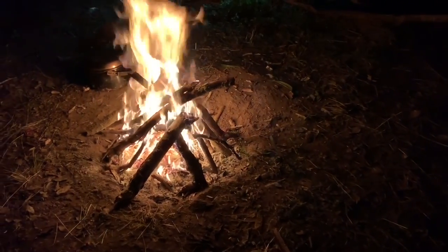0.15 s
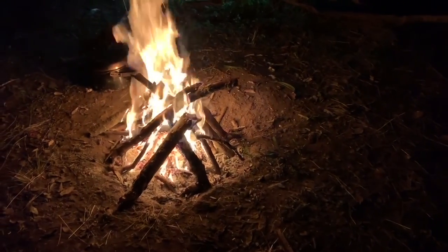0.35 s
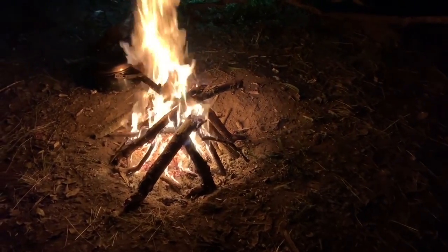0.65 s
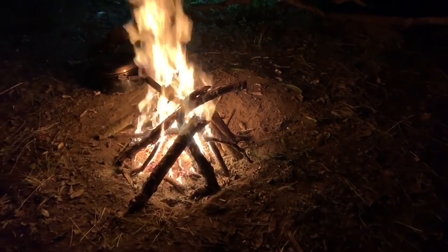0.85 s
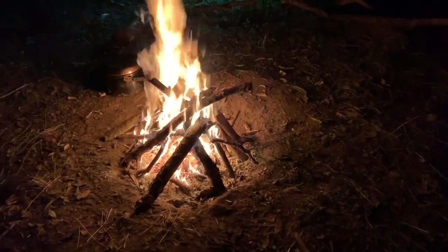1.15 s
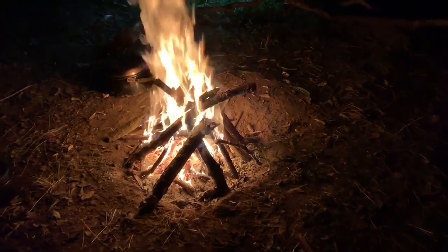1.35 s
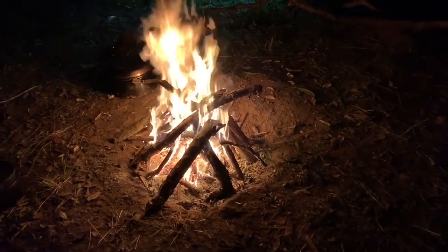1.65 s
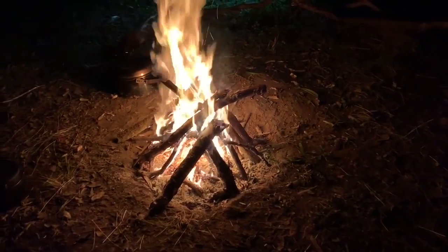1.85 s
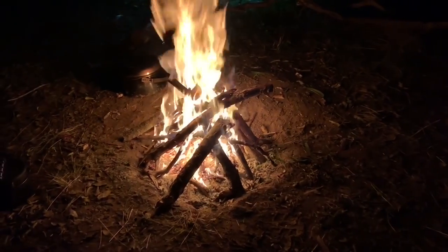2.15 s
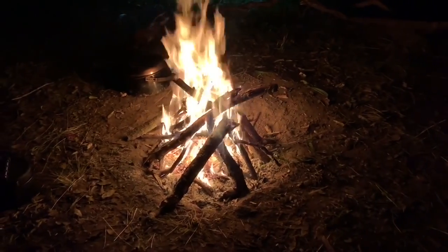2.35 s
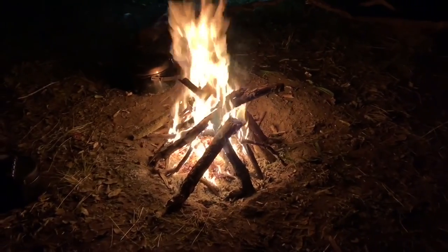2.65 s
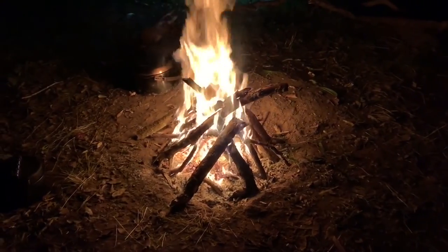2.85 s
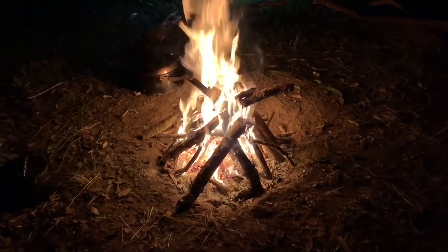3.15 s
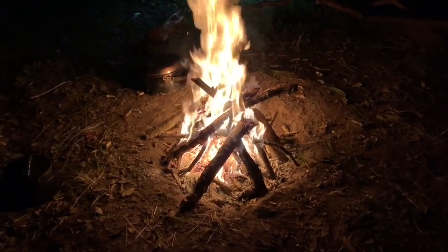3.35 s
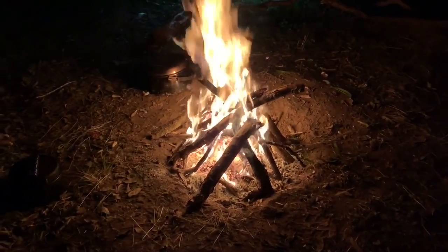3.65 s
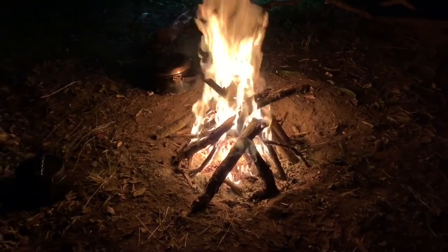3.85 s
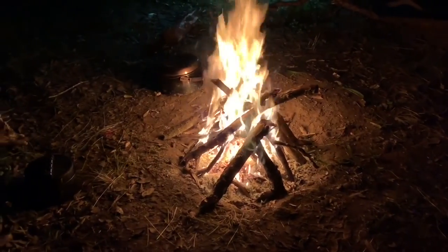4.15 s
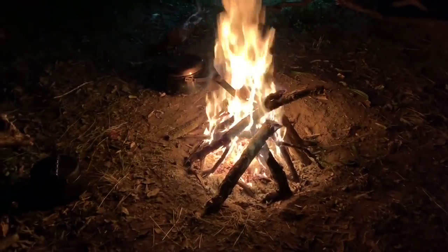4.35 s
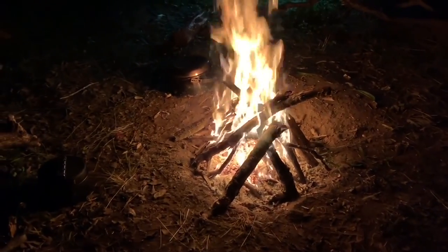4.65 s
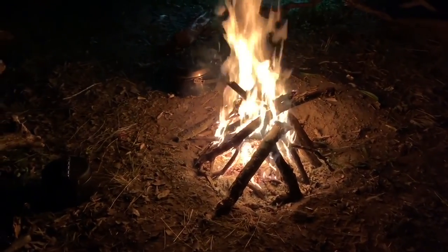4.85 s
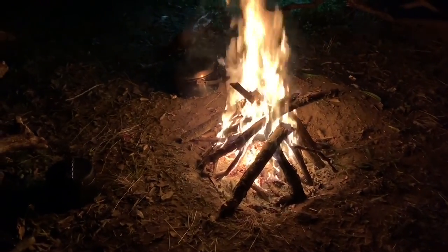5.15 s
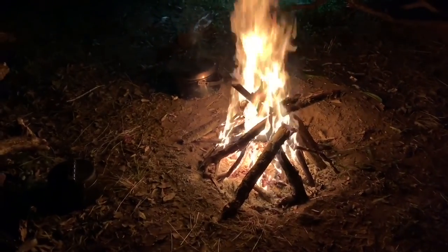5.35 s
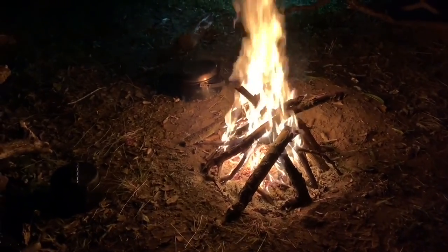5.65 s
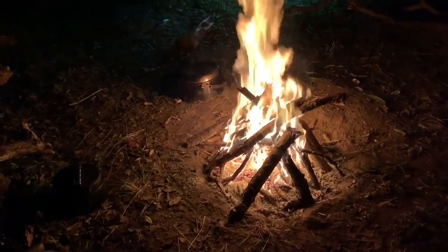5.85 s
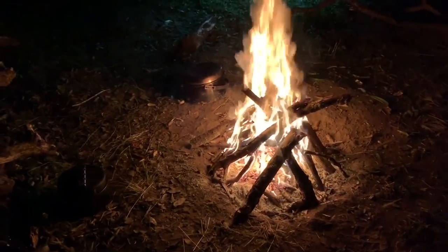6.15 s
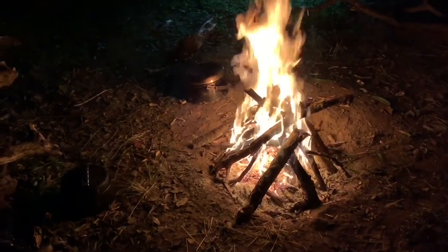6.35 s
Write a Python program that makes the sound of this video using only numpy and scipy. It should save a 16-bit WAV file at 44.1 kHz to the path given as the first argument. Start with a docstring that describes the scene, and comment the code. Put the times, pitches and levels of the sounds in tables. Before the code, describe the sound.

Crickets trill all around a low, rumbling campfire as sap snaps in bursts and burning sticks knock and settle.

```python
"""Tree crickets trill all around a low, rumbling wood fire: outdoors at night, a two-port phone
microphone a couple of metres from the flames. Pockets of sap pop and sputter steam, the flames flap,
sticks knock as they settle. Off to the left two lone crickets chirp in pairs with strokes of their
wings. Ground and bushes scatter pops, knocks and cricket song into a short tail."""
import sys
import numpy as np
from scipy import signal
from scipy.fft import rfft, irfft
from scipy.io import wavfile
from scipy.ndimage import uniform_filter1d

SR = 44100
rng = np.random.default_rng(int(sys.argv[2]) if len(sys.argv) > 2 else 0)


def inscribe(sig):
    """Save sig as 16-bit PCM at rate SR to the path in sys.argv[1].

    A 1-D sig is mono; a 2-D sig holds one channel per row.
    Samples are clipped to [-1, 1] before scaling.
    """
    pcm = np.round(np.clip(np.atleast_2d(sig).T, -1, 1) * 32767)
    wavfile.write(sys.argv[1], SR, pcm.astype(np.int16))


N = 286559
T = np.arange(N) / SR


def undb(db):
    return 10 ** (np.asarray(db) / 20)


def unit_rms(x):
    return x / np.sqrt(np.mean(x ** 2))


def unit_peak(x):
    return x / np.max(np.abs(x))


def gain_curve(rows):
    """Gain through (time [s], level [dB]) rows, silent outside them."""
    times, db = np.transpose(rows)
    return undb(np.interp(T, times, db, left=-150, right=-150))


def band(x, lo_hz, hi_hz):
    return signal.sosfilt(signal.butter(2, [lo_hz, hi_hz], "bandpass", fs=SR, output="sos"), x)


def coloured_noise(spectrum, side_db):
    """Mid-side stereo noise of rms 1, shaped by (frequency [Hz], relative density [dB]) rows."""
    hz, db = np.transpose(spectrum)
    log_hz = np.log(np.fft.rfftfreq(N, 1 / SR) + 1)
    gain = undb(np.interp(log_hz, np.log(hz), db, left=-99, right=-99))
    mid, side = irfft(rfft(rng.standard_normal((2, N))) * gain, N)
    return unit_rms(np.array([mid + undb(side_db) * side, mid - undb(side_db) * side]))


def wander(rate_hz):
    """Smooth random drift of rms 1, with about rate_hz new values a second."""
    hop = 32
    hold = max(int(SR / hop / rate_hz), 1)
    steps = np.repeat(rng.standard_normal(N // hop // hold + 2), hold)
    smooth = uniform_filter1d(uniform_filter1d(steps, hold), hold)
    return np.interp(np.arange(N) / hop, np.arange(len(smooth)), unit_rms(smooth))


def add(out, at_s, sound, pan_db):
    """Mix a short sound in; pan_db is left minus right."""
    start = int(at_s * SR)
    n = min(len(sound), N - start)
    out[:, start:start + n] += sound[:n] * undb([[pan_db / 2], [-pan_db / 2]])


def tree_crickets(count=20):
    """Chorus all around: each rubs its wings about 45 times a second, every stroke a falling tone."""
    # swell of the chorus: (time [s], level [dB])
    swell = [(0, -48.5), (3, -48.5), (6.5, -47.5)]
    out = np.zeros((2, N))
    ranks = np.linspace(-1, 1, count)  # lowest to highest voice
    for rank, (pace, distance, side, start, late) in zip(ranks, rng.random((count, 5))):
        strokes_per_s = (45.5 + 2.5 * (pace - .5)) * (1 + .04 * wander(9))
        strokes = start + np.cumsum(strokes_per_s) / SR
        progress = strokes % 1
        centre_hz = 2575 + 29 * rank + 110 * rank ** 3
        hz = centre_hz * (1 + .039 * (.5 - progress) + .002 * wander(2))
        stroke_phase = rng.random(N // 200)[strokes.astype(int)]
        phase = 2 * np.pi * (np.cumsum(hz) / SR + stroke_phase)
        envelope = np.sin(np.pi * np.clip(progress / .97, 0, 1)) * undb(2.26 * wander(18) - .97 * distance)
        song = envelope * (np.sin(phase) + undb(-23) * np.sin(2 * phase) + undb(-36.5) * np.sin(3 * phase))
        left_db = 4 * (side - .5)
        port_lag = int(11 * (late - .5))  # samples between the two ports
        out += np.array([song * undb(left_db), np.roll(song, port_lag) * undb(-left_db)])
    direct = unit_rms(out)
    chorus = unit_rms(direct + undb(-4) * scatter(direct))  # some sing from inside the bushes
    return chorus * gain_curve(swell) * undb(1.13 * wander(13))


def flame_roar(level_db=-48, swell_db=1.3):
    """Low turbulent roar of the flames, nearly the same at both ports."""
    # colour of the roar: (frequency [Hz], relative density [dB])
    spectrum = [(12, -46), (20, -11), (32, -4), (48, 2), (108, -5), (157, -8.5), (217, -12.5), (387, -36.5),
                (414, -35.5), (500, -41), (650, -77.5), (1100, -120)]
    roar = coloured_noise(spectrum, side_db=-21) * undb(level_db + swell_db * wander(7.6))
    return roar * undb([[-.7], [.7]])  # a little to the right


def night_air(level_db=-71.5):
    """A faint, wide bed of night air, far insects and flame hiss."""
    # colour of the bed: (frequency [Hz], relative density [dB])
    spectrum = [(300, -18), (450, -3), (700, 0.5), (1100, -4), (1600, -12), (2100, 0), (3000, 5),
                (3500, -44), (4000, -10.5), (4500, -2.5), (5900, -13), (7000, -20.5), (10000, -12),
                (13500, -17.5), (15500, -25)]
    return coloured_noise(spectrum, side_db=-5.5) * undb(level_db + .21 * wander(2.3))


def sap_pops(ring_db=-7.5, thud_db=-21.5, fizz_db=8.4):
    """Sap pockets burst, each one sharp blow amid a few ms of tearing; tiny ticks drizzle between."""
    # bursts of sap: (time [s], level [dB], crack pitch [Hz], relative ring of the wood [dB])
    bursts = [(0.2532, -48.5, 8300, -7), (0.5796, -55, 10600, -20), (0.617, -51, 9500, -23),
              (0.657, -56, 8550, -26), (0.7286, -54, 9600, -8), (0.8582, -56, 11800, -13),
              (0.909, -56.5, 4160, -2.5), (1.0095, -60, 10300, -13), (1.2246, -41, 11800, -1.5),
              (1.2484, -39.5, 14000, -21), (1.2548, -37, 9800, -2), (1.2765, -26, 9900, -19),
              (1.2789, -31.5, 9500, -0.5), (1.2826, -48, 8500, 2), (1.3168, -38, 9100, -19),
              (1.3271, -29, 5330, -4.5), (1.452, -60, 9300, -13), (1.781, -54, 11800, 0),
              (1.8228, -52.5, 8060, -25), (1.8854, -56, 9700, -14), (1.995, -58.5, 13500, -1),
              (2.5823, -54.5, 6400, 10), (2.7549, -56, 13500, -3), (3.1803, -51, 4900, -18),
              (3.2785, -52, 4700, -5), (3.35, -51.5, 4800, -3), (3.4556, -52, 13300, -18),
              (3.4937, -50.5, 9500, -31), (3.5286, -50, 9500, -20), (3.568, -49.5, 8700, -26),
              (3.6034, -46, 10300, -19), (3.639, -43.5, 9500, -32), (3.6727, -40, 9300, -36),
              (3.764, -44, 8500, -38.5), (3.7819, -24, 8800, 2), (4.221, -41, 7770, -26),
              (4.2407, -62, 6530, -16), (4.533, -62, 12700, -13), (4.691, -45, 10500, -28),
              (4.791, -69, 6560, -2), (5.3242, -39.5, 7750, 5), (5.5824, -53, 4700, -10),
              (5.791, -43.5, 8400, -35), (5.814, -47, 8800, -18), (5.8474, -39.5, 9000, -12),
              (5.8783, -22, 4820, -1), (5.8914, -32.5, 9600, -0.5), (5.9196, -30.5, 10000, -21),
              (6.3735, -60, 6900, -15), (6.4222, -55, 8200, -22)]
    # a pop's crack, thud, wood, snap, fizz and click: (low edge [Hz], high edge [Hz])
    bands = [(7600, 11000), (820, 1300), (1750, 2800), (3300, 5600), (11900, 15400), (5600, 7600)]
    # balance of each band at the microphone: (left minus right [dB])
    pans = [-6.5, 3.5, 1, -0.5, 0, -1.5]
    out, t = np.zeros((2, N)), T[:600]
    envelope = unit_peak(t * np.exp(-t / .0007))
    blow = np.arange(len(t)) == np.argmax(envelope)
    centres_hz = np.sqrt(np.prod(bands, axis=1))
    for at_s, db, crack_hz, wood_db in bursts:
        start_s = at_s - t[blow][0]
        tear = rng.standard_normal(len(t)) * envelope
        narrowness = max(-1.5 - 3.7 * wood_db, 1)  # the less the wood rings, the narrower the crack
        bands_db = -narrowness * np.log2(centres_hz / crack_hz) ** 2
        bands_db[1:3] = wood_db + thud_db, wood_db
        bands_db[4] += fizz_db
        ring = unit_peak(band(blow + tear / 2, crack_hz * .93, crack_hz * 1.07))
        add(out, start_s, undb(db + ring_db) * ring, pans[0])
        for (lo, hi), band_db, pan_db in zip(bands, bands_db, pans):
            force = blow + (lo / 7000) ** 2 * tear  # tearing in the treble, the blow in the wood
            part = unit_peak(band(band(force, lo, hi), lo, hi))
            add(out, start_s, undb(db + band_db) * part, pan_db)
    for when, size, pitch, side in rng.random((70, 4)):
        tick = band(rng.standard_normal(len(t)) * envelope, 5000 * 1.8 ** pitch, 9000 * 1.6 ** pitch)
        tick_db = -72 - 4.8 * np.log(size)
        add(out, when * T[-1], undb(tick_db) * unit_peak(tick), pan_db=-1 + 4 * (side - .5))
    return out


def wing_stroke(top_hz, drop_hz, seconds, rough_db=3.5):
    """One scrape of a cricket's wing: an uneven tone that sinks towards its end."""
    progress = np.linspace(0, 1, int(seconds * SR))
    teeth = undb(rough_db * unit_rms(uniform_filter1d(rng.standard_normal(len(progress)), size=70)))
    hz = top_hz - drop_hz * progress ** 1.6
    return np.sin(2 * np.pi * np.cumsum(hz) / SR) * np.sin(np.pi * progress) * teeth / teeth.max()


def field_cricket(gap_s=.102):
    """Off to the left, paired chirps: each is a wing stroke followed by a weaker one."""
    # pairs of chirps: (time [s], level [dB])
    pairs = [(0.456, -66), (1.122, -67), (1.83, -68), (2.493, -69), (3.177, -69), (3.868, -67), (4.58, -73),
             (5.29, -72), (6.017, -68)]
    out = np.zeros((2, N))
    for start_s, db in pairs:
        for at_s in (start_s, start_s + gap_s):
            add(out, at_s, undb(db) * wing_stroke(4020, 330, .036), pan_db=4.5)
            add(out, at_s + .048, undb(db - 7) * wing_stroke(3950, 280, .03), pan_db=4.5)
    return out


def steam():
    """Steam escapes from cracks in the wood: a bright hiss that sputters in gritty grains."""
    # jets of steam, one list each: (time [s], level [dB])
    jets = [
        [(0.56, -71.5), (0.79, -85), (0.9, -80)],
        [(2.56, -89), (2.664, -77), (2.8, -84)],
        [(3.42, -75), (3.492, -62), (3.632, -77), (3.708, -60.5), (3.77, -71)],
        [(5.68, -74), (5.744, -82), (5.87, -62)],
    ]
    # colour of the hiss: (frequency [Hz], relative density [dB])
    spectrum = [(5500, -11), (7000, -20), (8200, -6.5), (10000, 7), (13500, -5.5), (15500, -5)]
    hiss = coloured_noise(spectrum, side_db=11.5)
    sputter = undb(2.5 * wander(40) + 3.5 * wander(500))
    return hiss * sum(gain_curve(jet) for jet in jets) * sputter


def flame_flaps(centre_hz=582):
    """A flapping flame gives a soft puff of noise."""
    # flaps: (time [s], level [dB])
    flaps = [(0.604, -68), (0.984, -63.5), (1.136, -64), (1.519, -63.5), (1.761, -66), (1.876, -65),
             (3.433, -59.5), (4.137, -63), (4.864, -66), (5.006, -65), (5.998, -66)]
    out, t = np.zeros((2, N)), T[:4000]
    for at_s, db in flaps:
        noise = band(rng.standard_normal(len(t)), centre_hz * .63, centre_hz * 1.62)
        puff = unit_peak(noise * t * np.exp(-t / .014))
        add(out, at_s, undb(db) * puff, pan_db=1.2)
    return out


def stick_knocks(rattle_t60_s=.11):
    """Settling sticks knock and rattle, ringing most in the modes favoured by the spot that is hit."""
    # knocks: (time [s], level [dB], relative brightness [dB], favoured frequency [Hz])
    knocks = [(2.13, -42.5, -0.5, 720), (2.196, -47.5, -5.5, 1470), (2.583, -52.5, 6, 1850),
              (2.637, -57, -2, 1090), (2.664, -47.5, -4, 1100), (2.696, -53, -0.5, 1100),
              (2.717, -53, 4, 1100), (2.736, -51, -6, 1100), (2.77, -57, -8, 1100), (5.325, -33, 2, 1240),
              (5.352, -37.5, -1.5, 1030), (5.376, -49, 3, 1390), (5.399, -54, -10, 1200),
              (5.463, -54.5, -10, 1180)]
    # modes of the sticks: (frequency [Hz], relative level [dB], t60 [s])
    modes = [(727, -16.5, 0.1), (910, -10, 0.014), (1030, -10.5, 0.11), (1108, -7, 0.035), (1487, 1, 0.021),
             (1850, 0, 0.024), (1990, -6, 0.034), (2215, -1, 0.053), (3060, 12, 0.1), (3540, 0, .04)]
    out, t = np.zeros((2, N)), T[:12000]
    hz, mode_db, t60 = np.transpose(modes)[:, :, None]
    for at_s, db, bright_db, spot_hz in knocks:
        rattle = rng.standard_normal(len(t)) ** 3 * 1000 ** (-t / rattle_t60_s) * (1 - np.exp(-t / .0013))
        gains = undb(mode_db + 2.5 * rng.standard_normal(hz.shape) - 22 * np.log2(hz / spot_hz) ** 2)
        ring = np.sum(gains * np.sin(2 * np.pi * hz * t) * 1000 ** (-t / t60), axis=0)
        body = unit_peak(band(signal.fftconvolve(rattle, ring)[:len(t)], 510, 4400))
        edge = undb(bright_db) * unit_peak(band(rattle, 2470, 9400))
        add(out, at_s, undb(db) * (body + edge), pan_db=.3)
    return out


def small_cricket(gap_s=.051):
    """A smaller, higher cricket further left sings pairs of short wing strokes."""
    # pairs of strokes: (time [s], level [dB])
    pairs = [(4.4363, -62), (4.8115, -64), (5.5802, -65), (6.3565, -63)]
    out = np.zeros((2, N))
    for start_s, db in pairs:
        for at_s in (start_s, start_s + gap_s):
            add(out, at_s, undb(db) * wing_stroke(4870, 330, .024), pan_db=6)
    return out


def scatter(direct, low_t60_s=.19, high_t60_s=.21, rise_s=.005):
    """Echoes off ground and bushes: a short noisy tail, alike at both ports only in its low band."""
    t = T[:16000]
    (mid, side), wide = rng.standard_normal((2, 2, len(t)))
    low = band(mid + .057 * side * np.array([[1], [-1]]), 390, 2500)
    high = band(band(wide, 1680, 10000), 1790, 19000)
    tail = .31 * low * 1000 ** (-t / low_t60_s) + high * 1000 ** (-t / high_t60_s)
    tail *= 1 - np.exp(-(t / rise_s) ** 2)
    tail /= np.sqrt(np.sum(tail ** 2) / 2)
    return signal.fftconvolve(direct.mean(axis=0)[None], tail, axes=1)[:, :N]


def port_delay(fire, split_hz=3000, lag_samples=11):
    """The treble of the fire reaches the left port a little later than the right."""
    low = signal.sosfiltfilt(signal.butter(2, split_hz, fs=SR, output="sos"), fire)
    high = fire - low
    return low + np.array([np.roll(high[0], lag_samples), high[1]])


def scene():
    """The fire a couple of metres off, its echoes, and crickets in the dark around it."""
    pops, knocks = sap_pops(), stick_knocks()
    lone_crickets = field_cricket() + small_cricket()
    air = night_air()
    crackle = port_delay(pops + knocks + steam())
    echoes = scatter(undb(-6.5) * pops + undb(-5) * knocks + undb(-4) * lone_crickets)
    return crackle + echoes + flame_roar() + flame_flaps() + tree_crickets() + lone_crickets + air


def record(dry):
    """The microphone port rings near 8 kHz and has a notch above; the recorder cuts at 15.6 kHz."""
    ringing = dry + .5 * signal.lfilter(*signal.iirpeak(8250, 9.5, fs=SR), dry)
    notched = signal.lfilter(*signal.iirnotch(11450, 7.5, fs=SR), ringing)
    return signal.sosfilt(signal.ellip(8, .2, 70, 15600, fs=SR, output="sos"), notched)


dry = scene()
out = record(dry)
inscribe(out)
```